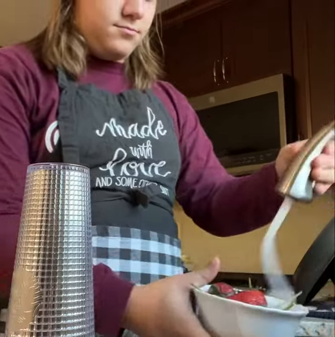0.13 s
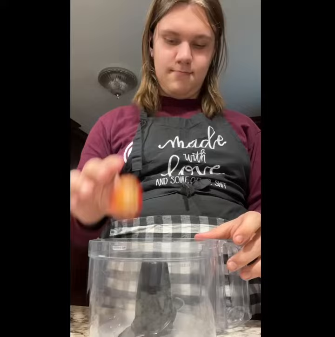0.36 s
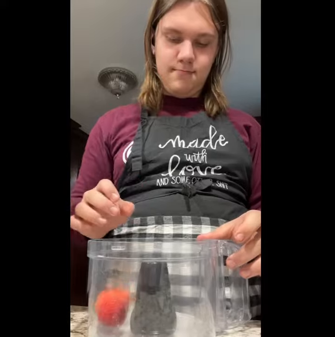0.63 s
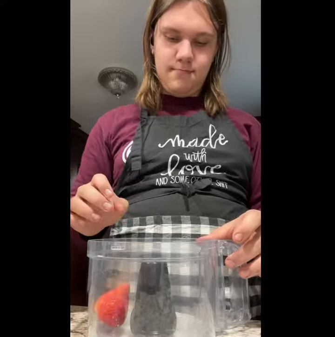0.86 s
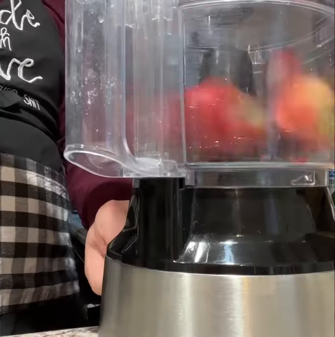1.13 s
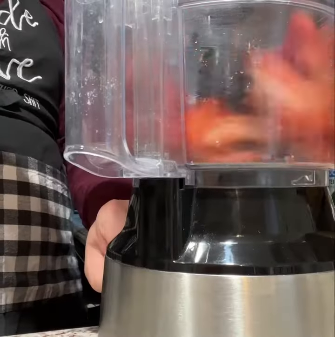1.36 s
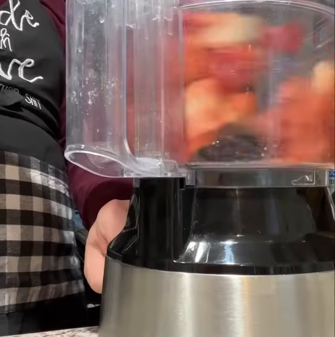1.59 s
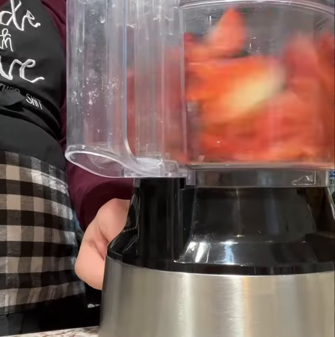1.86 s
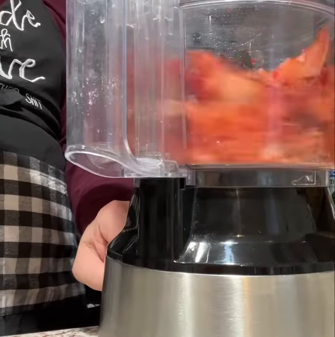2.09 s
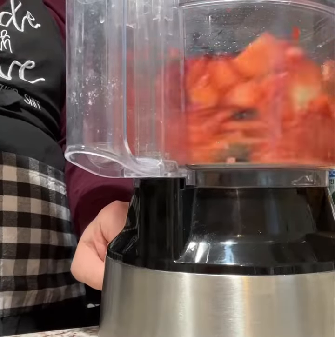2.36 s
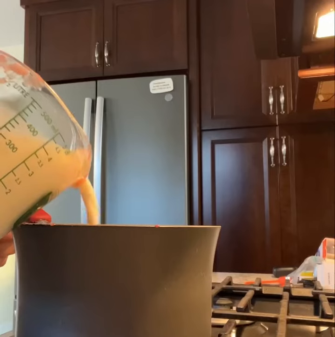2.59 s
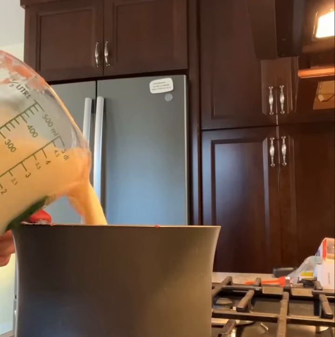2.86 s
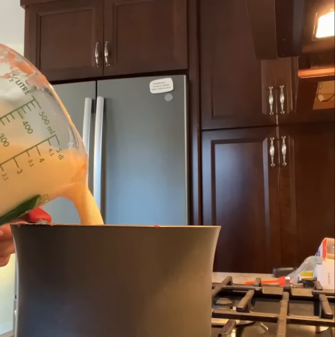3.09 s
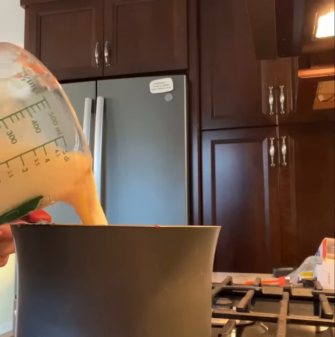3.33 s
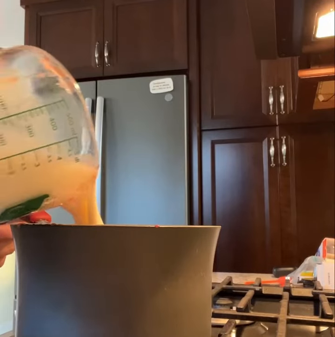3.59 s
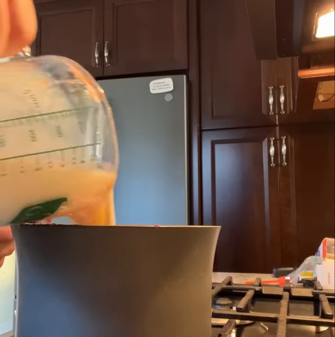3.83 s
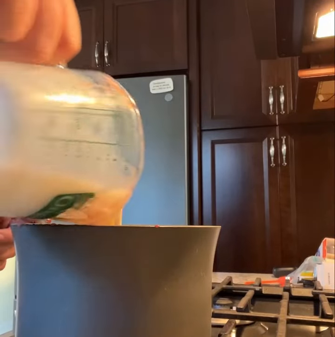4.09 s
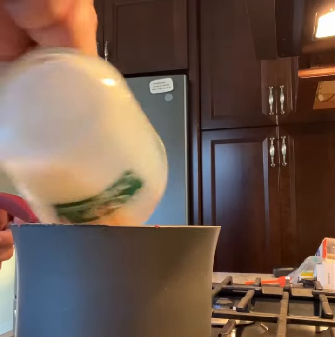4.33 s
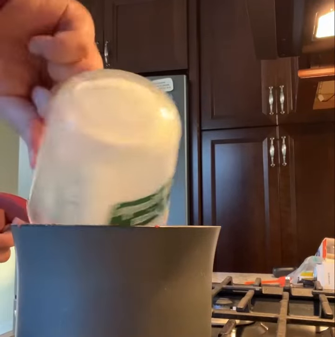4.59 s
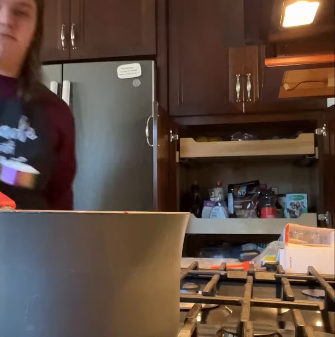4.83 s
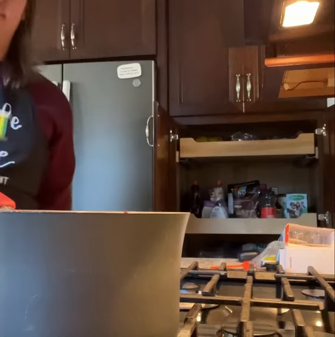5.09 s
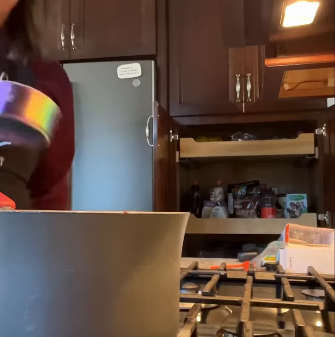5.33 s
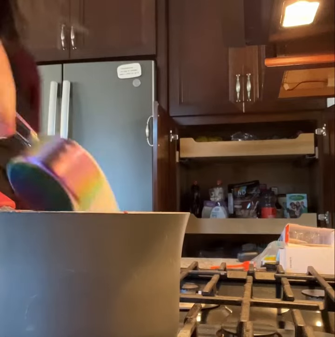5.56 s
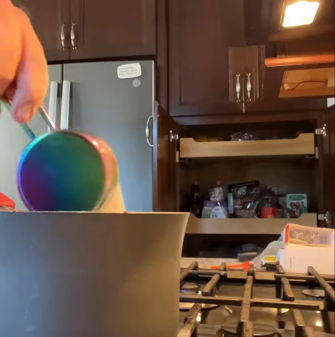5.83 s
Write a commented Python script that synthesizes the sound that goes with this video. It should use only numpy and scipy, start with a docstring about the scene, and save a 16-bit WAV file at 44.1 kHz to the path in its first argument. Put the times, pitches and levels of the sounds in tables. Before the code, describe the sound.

In a small indoor kitchen, close and dry, a brief tap spray cuts to a berry knocking and rattling inside a hard plastic jar. A blender then bursts in, lumpy at first, rising into a steady howling roar, and cuts off abruptly. Thick puree pours quietly into a pot with small plops and drips over refrigerator hum, then sugar is scooped with soft grainy swishes.

```python
"""A tap runs over fruit, then four more short shots of jam making in a kitchen, joined by quick fades:
a berry drops into a plastic jar and rattles the blade, the blender chops the fruit, puree is poured into a pot,
sugar is scooped. A refrigerator hums behind the first four shots. Hard parts ring as struck resonators, liquids are
shaped noise and bubble resonators, the motor and howl are moving sines, sugar is a dense rain of clicks."""
import sys
import numpy as np
from scipy import signal
from scipy.fft import rfft, irfft, next_fast_len
from scipy.io import wavfile

SR = 44100
rng = np.random.default_rng(int(sys.argv[2]) if len(sys.argv) > 2 else 0)


def to_wav(s):
    """Save 16-bit WAV."""
    ch = np.atleast_2d(s).T  # columns
    pcm = np.round(np.clip(ch, -1, 1) * 32767)  # PCM
    wavfile.write(sys.argv[1], SR, pcm.astype(np.int16))


def ratio_of_db(decibels):
    """Turn decibels (scalar or array-like) into linear amplitude factors; 0 dB maps to 1."""
    return 10 ** (np.asarray(decibels, float) / 20)


N = 262127

# joins between shots [t/s]
CUTS_S = [0.176, 0.97, 2.574, 4.706]
FADE_OUT_S, FADE_IN_S = 0.035, 0.024

# room tone by shot [level/dB]
SHOT_DB = [-3.5, 4, -0.5, 0, -51]
# refrigerator tones [f/Hz, level/dB]
FRIDGE_TONES = [(59.2, -61), (118.4, -48.5), (177.6, -80), (215.3, -66.5), (242.2, -57.5), (468.3, -50),
                (592.2, -56), (839.8, -61), (936.7, -58.5), (1120, -67), (1410, -64)]
# fan and air spectrum [f/Hz, level/dB]
FAN_SPECTRUM = [(18, -57), (30, -37.5), (118, -7.5), (170, -12), (336, -11.5), (461, -4), (780, -18),
                (937, -10.5), (1250, -24), (1390, -19.5), (1960, -26.5), (4000, -39), (7500, -47),
                (10500, -57.5), (13500, -51), (16000, -60)]
# still room of the last shot, spectrum [f/Hz, level/dB]
STILL_SPECTRUM = [(18, -57), (30, -15.5), (109, -8), (149, -12), (252, -1.5), (303, -7.5), (426, -9.5),
                  (684, -19.5), (760, -18), (6050, -28), (16000, -41.5)]
FAN_DB, STILL_DB = -47, -55.5

# tap spray spectrum [f/Hz, level/dB]
SPRAY_SPECTRUM = [(880, -46), (1500, -9), (1710, -11.5), (2120, -15), (2270, -13.5), (4420, -0.5),
                  (5660, -8), (7100, 0), (9280, -16), (14800, -6), (16000, -24)]
TAP_OFF_S, SPRAY_DB = .172, -35
# gurgle swells as the bowl fills: start, slope, ceiling
GURGLE_DB, GURGLE_DB_PER_S, GURGLE_TOP_DB = -63, 420, -35

# knocks on the jar, the last two being the blender's switch clicks [t/s, strike level/dB, favoured f/Hz, crack
# level/dB, tick level/dB]
KNOCKS = [(0.404, -22.5, 550, -61.5, -69), (0.414, -39.5, 1530, -44, -51.5), (0.433, -4, 530, -6, -10.5),
          (0.441, -2.5, 456, -26, -31.5), (0.453, -9.5, 1490, -11.5, -39.5), (0.468, 3, 536, -16.5, -41.5),
          (0.482, -5, 577, -17, -27), (0.501, 3.5, 1070, -10.5, -32), (0.514, 2, 540, -13.5, -40),
          (0.532, -1, 555, -20, -39.5), (0.552, 3.5, 516, -19, -45.5), (0.574, 2.5, 1180, -13, -38.5),
          (0.599, -7, 430, -46, -59), (0.617, -5.5, 660, -37.5, -53), (0.635, -6, 647, -38.5, -54),
          (0.658, -8.5, 510, -48.5, -65.5), (0.72, -11, 576, -37, -72), (0.772, -15.5, 556, -46.5, -72),
          (0.819, -26, 535, -70, -80), (1.019, -24, 456, -45.5, -44.5), (1.035, -7.5, 637, -14.5, -38.5)]
# jar modes [f/Hz, level/dB, t60/s]
JAR_MODES = [(70, -25, 0.062), (209, -4, 0.062), (273, -0.5, 0.045), (434, -5, 0.04), (554, -4, 0.071),
             (579.4, -1.5, 0.056), (710, 3.5, 0.0075), (988, -7, 0.052), (1220, -7.5, 0.034),
             (1490, -7.5, 0.021), (1734, -10, 0.047), (2450, -10, 0.017), (2950, -14, 0.0059),
             (3320, -5, 0.016)]
# crack and clatter spectrum [f/Hz, level/dB]
CRACK_SPECTRUM = [(59, -64.5), (100, -33.5), (350, -28.5), (570, -2), (736, -11.5), (1230, -10),
                  (1550, -15), (1760, -13.5), (2170, -20), (3400, -20.5), (16000, -52)]
# loose blade rattling on its spindle: start, end of hold, level, decay; share that rings the jar
RATTLE_S, RATTLE_HOLD_UNTIL_S, RATTLE_DB, RATTLE_DB_PER_S, RATTLE_BODY_DB = .436, 0.62, -31.5, 184.5, -26.5

# short thin hiss [t/s, level/dB]
PUFF_LEVEL = [(0.87, -98), (0.914, -55), (0.936, -50), (0.964, -52), (0.97, -70)]
# hiss spectrum [f/Hz, level/dB]
PUFF_SPECTRUM = [(1470, -78), (2500, -42), (2970, -20), (3220, -31), (3980, -14), (4820, -22), (7580, -3),
                 (8850, -29), (11000, -43), (14300, -69), (22000, -120)]

# chopping load [t/s, churn level/dB]
CHURN = [(1.032, -36.5), (1.046, -27), (1.066, -15), (1.11, -16.5), (1.17, -16), (1.19, -12), (1.3, -15),
         (1.45, -14.5), (1.64, -15), (1.84, -19), (1.95, -19), (2.09, -20), (2.16, -19), (2.35, -21.5),
         (2.56, -21), (2.575, -30)]
# roar spectrum [f/Hz, level/dB]
ROAR_SPECTRUM = [(18, -71), (30, -33.5), (194, -10), (267, -10), (688, -14), (969, -11), (1870, -11.5),
                 (2190, -4.5), (2500, -9.5), (2700, -7), (3610, -13.5), (6280, -12.5), (10600, -25),
                 (14600, -11.5), (16200, -58)]
# housing resonances [f/Hz, width/Hz, level over the roar/dB]
HOUSING = [(285.6, 67, 11), (770, 90, 0), (1450, 60, 2.5), (1637, 140, 4.5), (2450, 110, -3.5),
           (2900, 31, 6), (3360, 32, 4), (3700, 150, -0.5), (4160, 15, 9.5), (4480, 410, -4),
           (4820, 410, 3), (6250, 350, -2), (6910, 220, -14.5), (7460, 930, 2)]
# blade meets a big piece [t/s, lump swell/dB]
CHUNKS = [(1.078, 13), (1.184, 0), (1.3, 4), (1.444, 5), (1.62, 0), (1.952, 5.5)]
CHUNK_S = 0.018
# over the churn: lumps at the start, their fall, splatter, air
LUMPS_DB, FINER_DB_PER_S, SPLATTER_DB, AIR_DB = -4, 3.5, -3, -16.5
# splatter missing while the fruit is dry; time constant of wetting
DRY_DB, WETTED_S = 12, .12
# blade throb [t/s, rate/Hz]
BLADE_RATE = [(1.05, 29), (1.3, 37.2), (1.8, 49), (2.58, 45.3)]
# throb in the roar, strongest while the pieces are big
THROB_DB, THROB_FADES_S = 1.5, 0.39
# motor [t/s, twice the shaft rate/Hz, drone level/dB]
MOTOR = [(1.05, 576, -23), (1.078, 550, -11), (1.092, 529.5, -9), (1.162, 546, -13.5),
         (1.176, 546.5, -17.5), (1.28, 535.4, -19), (1.474, 558.6, -18), (1.86, 564, -26),
         (1.96, 573, -33.5), (1.972, 578, -28), (2.016, 570, -30), (2.048, 530, -42.5), (2.06, 530, -51)]
# drone partials [multiple of the motor f/1, level/dB]
DRONE_PARTIALS = [(.5, -26), (1, 3.5), (1.5, -9), (2, -14), (2.5, -13.5), (3, -14)]
# jar howl [t/s, level/dB]
HOWL_LEVEL = [(1.05, -36.5), (1.12, -22), (1.28, -24), (1.4, -20), (1.5, -24), (1.6, -22), (1.8, -20.5),
              (1.88, -30.5), (1.97, -24.5), (2.1, -27), (2.58, -33)]
# spin-up: howl pitch climbs, its scatter narrows
SPIN_S, SPIN_UP_S, HOWL_HZ, SCATTER_HZ = 1.05, .27, (1250, 2200), (90, 18)
# gear whine once up to speed
WHINE_S, WHINE_HZ, WHINE_DB = 1.3, 2656, -31

# puree flow [t/s, splash level/dB]
FLOW = [(2.6, -78.5), (2.8, -67), (2.9, -62.5), (2.99, -56.5), (3.1, -63.5), (3.2, -68.5), (3.3, -73),
        (3.4, -53.5), (3.49, -56), (3.63, -62.5), (3.75, -68), (3.86, -57.5), (4.0, -67), (4.1, -72),
        (4.2, -66), (4.37, -72), (4.52, -60), (4.7, -78.5)]
# fizz spectrum [f/Hz, level/dB]
FIZZ_SPECTRUM = [(530, -45), (900, -26), (1200, -13.5), (2000, -8.5), (3090, -4), (4130, -13), (6080, -25),
                 (10500, -22), (14400, -31), (16200, -38)]
# heavier globs [t/s, level before a fixed trim/dB]
GLOBS = [(2.913, -30), (2.997, -27), (3.298, -42.5), (3.396, -31.5), (3.456, -30), (3.547, -45),
         (3.598, -39), (3.919, -49), (4.177, -30.5), (4.377, -41.5)]
# plops and small stray drops, levels over the splash
PLOP_DB, STRAY_PER_S, STRAY_DB = 2.5, 190, -5
# drops [t/s, low ring level/dB, low ring f/Hz, high ring f/Hz, high ring and tick level before trims/dB]
DROPS = [(2.6302, -57, 2400, 8450, -50.5), (2.6704, -60, 2410, 6270, -59.5), (2.7384, -49, 2060, 6270, -62),
         (2.8204, -51, 3940, 5770, -46.5), (2.8514, -38.5, 3030, 5750, -51),
         (2.8886, -40, 3040, 5910, -48.5), (2.9066, -42, 2950, 5530, -41), (2.9436, -42, 2320, 5130, -56.5),
         (2.9637, -36, 2450, 4970, -57), (3.0295, -34, 2980, 5420, -61), (3.0894, -43, 2280, 6060, -64),
         (3.1627, -58, 2900, 8880, -54), (3.2025, -45, 2730, 6950, -58), (3.2331, -44, 2720, 4450, -62),
         (3.3206, -37, 2700, 5100, -55), (3.3391, -43, 2030, 7520, -44), (3.3686, -32.5, 3400, 5910, -49),
         (3.4004, -37, 2840, 5070, -41.5), (3.4165, -29, 3130, 5900, -37.5),
         (3.4433, -34, 2830, 4780, -46.5), (3.47, -28.5, 2800, 6240, -36.5),
         (3.5497, -30.5, 3270, 4830, -55), (3.588, -38, 2760, 4880, -49), (3.6087, -37.5, 2920, 5110, -42),
         (3.6384, -48, 2320, 5110, -52), (3.7274, -43, 2920, 6350, -61), (3.8121, -41, 2980, 4980, -55.5),
         (3.8445, -48, 2290, 5190, -47), (3.8772, -47, 3860, 4890, -60), (3.9084, -43, 2950, 5270, -57),
         (4.0342, -45, 2990, 4410, -72.5), (4.1611, -45, 2400, 4430, -62), (4.2394, -54, 2360, 4500, -63),
         (4.3028, -45, 3200, 4520, -52.5), (4.4149, -41.5, 2740, 4650, -65),
         (4.4917, -47.5, 2480, 4780, -61.5), (4.5111, -38.5, 2740, 4790, -58.5),
         (4.5364, -52, 2390, 4940, -63)]
# ticks soften as the pot's floor is covered
DULLING_DB_PER_S, DULLEST_DB = 12, 15

# sugar spectrum [f/Hz, level/dB]
SUGAR_SPECTRUM = [(290, -17.5), (500, -17.5), (538, -17), (587, -17), (935, -20), (1250, -11),
                  (1360, -12.5), (2110, -7), (3950, -6), (8060, -17.5), (11400, -29), (15100, -17.5),
                  (16200, -37)]
# strokes through sugar [t/s, hold/s, crunch level/dB, body over crunch/dB, sheen over crunch/dB]
STROKES = [(4.804, 0.018, -53.5, -6, -2), (4.954, .08, -35.5, -7, -11.5), (5.214, 0.069, -51, -35, -2.5),
           (5.358, .15, -44, -3.5, -9), (5.655, .2, -72, -8, 6.5)]
# bag shifts [t/s, hold/s, level/dB]
THUDS = [(4.741, 0.012, -58.5), (5.031, .1, -45.5), (5.316, .01, -60), (5.41, .01, -68)]
# stroke attack and release; finest crystals are heard first
DIG_DB_PER_S, SLIDE_DB_PER_S, SHEEN_LEAD_S = 450, 166, .012

# low-band decay time; reverb level
KITCHEN_T60_S, WET_DB = 0.19, -10.5


def rms_one(x):
    """Scale to rms 1."""
    return x / np.sqrt(np.mean(x ** 2) + 1e-20)


def white():
    """White noise, rms about 1."""
    return rng.standard_normal(N)


def in_time(rows, edge_s=0.00526):
    """Gate open while the table lasts, then its columns as sample-rate curves."""
    s, *columns = np.transpose(rows)
    t = np.arange(N) / SR
    gate = np.clip(np.minimum(t - s[0], s[-1] - t) / edge_s + 1, 0, 1)
    return [gate] + [np.interp(t, s, c) for c in columns]


def colour(x, spectrum):
    """Filter by a spectrum interpolated over log f; rms 1."""
    size = next_fast_len(N)
    hz = np.maximum(np.arange(size // 2 + 1) * SR / size, 1)
    point_hz, point_db = np.transpose(spectrum)
    gain = ratio_of_db(np.interp(np.log(hz), np.log(point_hz), point_db))
    return rms_one(irfft(rfft(x, size) * gain, size)[:N])


def band(x, low_hz, high_hz):
    """Band-pass."""
    return signal.sosfilt(signal.butter(2, [low_hz, high_hz], "band", fs=SR, output="sos"), x)


def split(x, edges_hz):
    """Soft-edged neighbouring bands that sum to the whole, then each scaled to rms 1."""
    size = next_fast_len(N)
    hz = np.arange(size // 2 + 1) * SR / size
    below = [0] + [1 / (1 + (hz / e) ** 6) for e in edges_hz] + [1]
    return [rms_one(irfft(rfft(x, size) * (b - a), size)[:N]) for a, b in zip(below, below[1:])]


def drift(rate_hz):
    """Slow chance, rms 1: noise at SR / 40 through a double pole, interpolated."""
    r = np.exp(-80 * np.pi * rate_hz / SR)
    slow = signal.lfilter([1], [1, -2 * r, r * r], rng.standard_normal(N // 40 + 2002))[2000:]
    return np.interp(np.arange(N) / 40, np.arange(len(slow)), rms_one(slow))


def tone(hz):
    """Sine of rms 1 on a moving pitch."""
    return np.sqrt(2) * np.sin(2 * np.pi * (np.cumsum(hz) / SR + rng.random()))


def ring(clicks, hz, t60_s):
    """Two-pole resonator: a unit click sets a sine of initial height 1 ringing."""
    r, w = ratio_of_db(-60 / (t60_s * SR)), 2 * np.pi * hz / SR
    return signal.lfilter([0, np.sin(w)], [1, -2 * r * np.cos(w), r * r], clicks + 1e-18)


def grains(per_s, spread_db):
    """Random clicks, sizes exponentially spread in dB."""
    sizes = ratio_of_db(spread_db * np.minimum(rng.exponential(1, N), 5)) * rng.choice([-1, 1], N)
    return sizes * (rng.random(N) < per_s / SR)


def bubbles(per_s, low_hz, high_hz, cycles):
    """Clicks dealt to 16 resonators spread in pitch, each passed twice for a soft onset; rms 1."""
    clicks = grains(per_s, spread_db=4.0)
    dealt = rng.integers(0, 16, N)
    total = np.zeros(N)
    for k, hz in enumerate(np.geomspace(low_hz, high_hz, 16)):
        once = ring(clicks * (dealt == k), hz, cycles / hz)
        total += rms_one(ring(once, hz, 0.76 * cycles / hz))
    return rms_one(total)


def dying(at, db, t60_s):
    """Envelope that jumps at the given samples and decays exponentially."""
    jumps = np.zeros(N)
    jumps[at] = ratio_of_db(db)
    return signal.lfilter([1], [1, -ratio_of_db(-60 / (t60_s * SR))], jumps + 1e-18)


def swell(start_s, hold_s, db, up_db_per_s, down_db_per_s):
    """Gain that rises to a level, holds and falls, linear in dB."""
    t = np.arange(N) / SR
    rise_db = up_db_per_s * np.maximum(start_s - t, 0)
    fall_db = down_db_per_s * np.maximum(t - start_s - hold_s, 0)
    return ratio_of_db(db - rise_db - fall_db)


def room_tone(shot):
    """Compressor tones waver, the higher ones more, over fan noise; the last shot adds a stiller room."""
    hum = np.zeros(N)
    for hz, db in FRIDGE_TONES:
        waver_db = min(hz / 160, 5.5) * drift(7.6)
        hum += ratio_of_db(db + waver_db) * tone(hz * (1 + .006 * drift(8)))
    fan = ratio_of_db(FAN_DB) * colour(white(), FAN_SPECTRUM)
    still = ratio_of_db(STILL_DB) * colour(white(), STILL_SPECTRUM)
    return ratio_of_db(np.array(SHOT_DB)[shot]) * (hum + fan) + (shot == len(CUTS_S)) * still


def tap():
    """Aerated spray as shaped noise above, water gurgling in the bowl as bubbles below."""
    t = np.arange(N) / SR
    spray = ratio_of_db(SPRAY_DB + 1.2 * drift(33)) * colour(white(), SPRAY_SPECTRUM)
    gurgle_db = np.minimum(GURGLE_DB + GURGLE_DB_PER_S * t, GURGLE_TOP_DB)
    gurgle = ratio_of_db(gurgle_db) * bubbles(3200, 152, 1280, cycles=21.0)
    return (t < TAP_OFF_S) * (spray + gurgle)


def jar():
    """Soft knocks, the blender's switch clicks and a dense rattle strike the jar's modes; each adds a crack and
    a bright tick."""
    s, strike_db, favoured_hz, crack_db, tick_db = np.transpose(KNOCKS)
    at = np.round(s * SR).astype(int)
    chance_db = rng.normal(0, 2.5, (len(s), len(JAR_MODES)))
    shaking = swell(RATTLE_S, RATTLE_HOLD_UNTIL_S - RATTLE_S, RATTLE_DB, 20000, RATTLE_DB_PER_S)
    rattle = shaking * rms_one(grains(1500, spread_db=-14.5))
    body = np.zeros(N)
    for k, (hz, level_db, t60_s) in enumerate(JAR_MODES):
        clicks = ratio_of_db(level_db + RATTLE_BODY_DB) * rattle
        reach_db = -np.minimum(14 * np.abs(np.log2(hz / favoured_hz)), 16)   # where it lands picks the modes
        clicks[at] += ratio_of_db(strike_db + level_db + 0.5 + chance_db[:, k] + reach_db) * (-1) ** k
        body += ring(clicks, hz, t60_s)
    body = band(body, 45, 3500)   # fruit is a soft hammer
    clatter = colour(white() + 0.38 * grains(750, spread_db=-1.5), CRACK_SPECTRUM)
    cracks = (dying(at, crack_db, 0.047) + shaking) * split(clatter, [1400])[1]
    ticks = dying(at, tick_db, 0.014) * rms_one(band(white(), 4900, 15800))
    return body + cracks + ticks


def puff():
    """Thin hiss: shaped noise under an envelope."""
    gate, db = in_time(PUFF_LEVEL)
    return gate * ratio_of_db(db) * colour(white(), PUFF_SPECTRUM)


def blender():
    """Roar, drone, howl and whine; one blade throb modulates the roar and the howl."""
    throb = tone(in_time(BLADE_RATE)[1] + 1.5 * drift(1.6))   # each sweep of the blade through the fruit
    since_s = np.maximum(np.arange(N) / SR - SPIN_S, 0)
    return fruit_roar(since_s, throb) + shaft_drone() + jar_howl(since_s, throb) + gear_whine()


def fruit_roar(since_s, throb):
    """Noise of fruit and air through the housing's resonances, levelled in four bands as the load changes."""
    t = np.arange(N) / SR
    gate, churn_db = in_time(CHURN)
    dry_db = DRY_DB * np.exp(-since_s / WETTED_S)
    chunk_db = sum(db * np.exp(-((t - s) / CHUNK_S) ** 2) for s, db in CHUNKS)
    lumps_db = LUMPS_DB - FINER_DB_PER_S * since_s + chunk_db
    levels_db = [lumps_db, 0, SPLATTER_DB - dry_db, AIR_DB - .4 * dry_db]
    roar = colour(white() + 0.17 * grains(490, spread_db=7.0), ROAR_SPECTRUM)
    for centre_hz, width_hz, db in HOUSING:
        peak = signal.iirpeak(centre_hz, centre_hz / width_hz, fs=SR)
        roar = roar + (ratio_of_db(db) - 1) * signal.lfilter(*peak, roar)
    slosh_db = 0.27 * drift(6.7) + THROB_DB * np.exp(-since_s / THROB_FADES_S) * throb
    flickers_db = [1.4, 0.16, .6, 0.29]
    out = np.zeros(N)
    for db, flicker_db, part in zip(levels_db, flickers_db, split(roar, [600, 3800, 9300])):
        out += ratio_of_db(churn_db + db + slosh_db + flicker_db * drift(27)) * part
    return gate * out


def shaft_drone():
    """Sines at multiples of the motor pitch, the higher ones less steady."""
    gate, hz, drone_db = in_time(MOTOR, edge_s=.01)
    return gate * sum(ratio_of_db(drone_db + db + 1.6 * k ** 1.4 * drift(30)) * tone(k * hz) for k, db in DRONE_PARTIALS)


def jar_howl(since_s, throb):
    """Narrow resonance as a scattered sine, rising with spin-up and beaten by the blade."""
    gate, howl_db = in_time(HOWL_LEVEL)
    hz = np.interp(since_s / SPIN_UP_S, [0, 1], HOWL_HZ)
    scatter_hz = np.interp(since_s / SPIN_UP_S, [0, 1], SCATTER_HZ)
    return gate * ratio_of_db(howl_db + 8.0 * throb + 2.2 * drift(23)) * tone(hz + scatter_hz * drift(40))


def gear_whine():
    """Unsteady sine that fades in once the gears are up to speed."""
    up = np.clip((np.arange(N) / SR - WHINE_S) / .1, 0, 1)
    return up * ratio_of_db(WHINE_DB + 1.8 * drift(8.7)) * tone(WHINE_HZ + 30 * drift(9.1))


def pour():
    """Thick puree plops (bubbles) and fizzes (shaped noise) into the pot, with drops on top."""
    gate, splash_db = in_time(FLOW)
    splash = bubbles(1100, 2200, 8000, cycles=26.0)
    fizz = colour(white() + 0.7 * grains(500, spread_db=5.0), FIZZ_SPECTRUM)
    wet = ratio_of_db(2.5 * drift(30)) * (.7 * splash + .7 * fizz)
    stray = ratio_of_db(STRAY_DB) * bubbles(STRAY_PER_S, 2098, 6500, cycles=36.0)
    globs = sum(swell(s, 0.0013, db - 16.5, 3000, 730) for s, db in GLOBS)
    plop_gain = ratio_of_db(splash_db + PLOP_DB + 1.3 * drift(24)) + globs
    plops = plop_gain * bubbles(500, 433, 1644, cycles=13.7)
    return gate * (ratio_of_db(splash_db) * (wet + stray) + plops) + drops(fizz)


def drops(fizz):
    """Each drop rings briefly at two rising pitches, throws up a small splash and ticks."""
    s, low_db, low_hz, high_hz, tick_db = np.transpose(DROPS)
    at, t = np.round(s * SR).astype(int), np.arange(int(.03 * SR)) / SR
    onset = np.minimum(t / 0.00043, 1)
    out = np.zeros(N)
    for i, (rise_per_s, t60_s) in enumerate(rng.uniform([0, .009], [8, .022], (len(DROPS), 2))):
        for hz, db in (low_hz[i], low_db[i]), (high_hz[i], tick_db[i] + 5):
            chirp = np.sin(2 * np.pi * hz * t * (1 + rise_per_s * t))
            out[at[i]:at[i] + len(t)] += ratio_of_db(db - 60 * t / t60_s) * chirp * onset
    splashes = dying(at, low_db - 20, 0.072) * fizz
    dulled_db = tick_db - np.minimum(DULLING_DB_PER_S * (s - s[0]), DULLEST_DB)
    ticks = dying(at, dulled_db, .014) * rms_one(band(white(), 6000, 15800))
    return out + splashes + ticks


def scoop():
    """Thousands of crystal clicks slide past the cup in three bands; the bag thuds as low noise."""
    body, crunch, sheen = split(colour(grains(5000, spread_db=1.5), SUGAR_SPECTRUM), [3000, 9000])
    slides = np.zeros(N)
    for s, hold_s, db, body_db, sheen_db in STROKES:
        stroke = swell(s, hold_s, db + 1.5 * drift(19), DIG_DB_PER_S, SLIDE_DB_PER_S)
        slides += stroke * (crunch + ratio_of_db(body_db) * body)
        slides += swell(s - SHEEN_LEAD_S, hold_s + SHEEN_LEAD_S, db + sheen_db, 600, 240) * sheen
    thuds = sum(swell(s, hold_s, db, 224, 263) for s, hold_s, db in THUDS)
    thud = rms_one(band(white(), 46, 111))
    return (np.arange(N) / SR > CUTS_S[-1]) * (slides + thuds * thud)


def kitchen(x):
    """Reverberation: convolution with dying noise, duller as it goes."""
    t = np.arange(int(.6 * SR)) / SR
    noise = rng.standard_normal(len(t))
    low = band(noise, 360, 2000) * ratio_of_db(-60 * t / KITCHEN_T60_S)
    high = 0.65 * band(noise, 3400, 6700) * ratio_of_db(-90 * t / KITCHEN_T60_S)
    tail = low + high
    return signal.fftconvolve(x, tail / np.sqrt(np.sum(tail ** 2)))[:N]


def scene():
    """Each shot fades out to the join and the next fades in; jar and pot excite the kitchen."""
    t = np.arange(N) / SR
    shot = np.searchsorted(CUTS_S, t)
    fade = np.ones(N)
    for cut_s in CUTS_S:
        fade *= np.clip(np.maximum((cut_s - t) / FADE_OUT_S, (t - cut_s) / FADE_IN_S), 0, 1)
    near, pot = jar(), pour()
    wet = ratio_of_db(WET_DB) * kitchen(near + ratio_of_db(5.0) * pot)
    chopping = blender() * (t < CUTS_S[2])
    mix = room_tone(shot) + tap() + near + puff() + chopping + pot + scoop() + wet
    return (fade * mix)[None]


def low_pass(x):
    """Removes everything above the highest recorded frequency."""
    return signal.sosfilt(signal.butter(12, 16830, fs=SR, output="sos"), x)


def record(dry):
    """Round the peaks, cut the deep bass."""
    rounded = 0.87 * np.tanh(dry / 1.035)
    mix = signal.sosfilt(signal.butter(3, 48, "high", fs=SR, output="sos"), rounded)
    return low_pass(mix)


dry = scene()
out = record(dry)
to_wav(out)
```